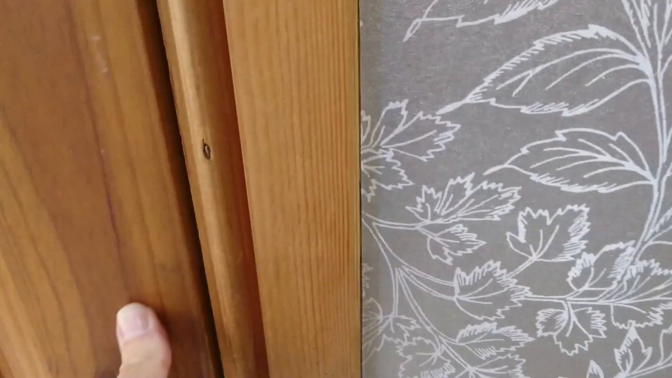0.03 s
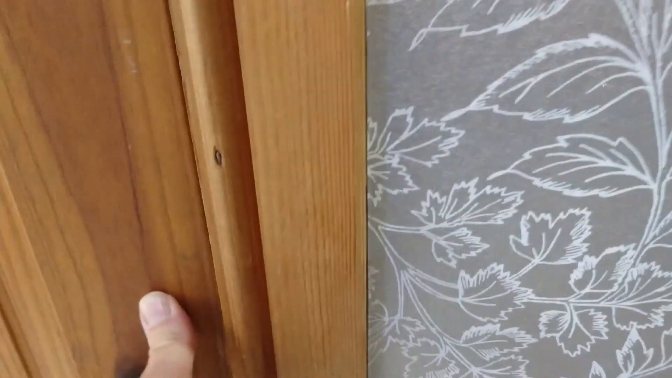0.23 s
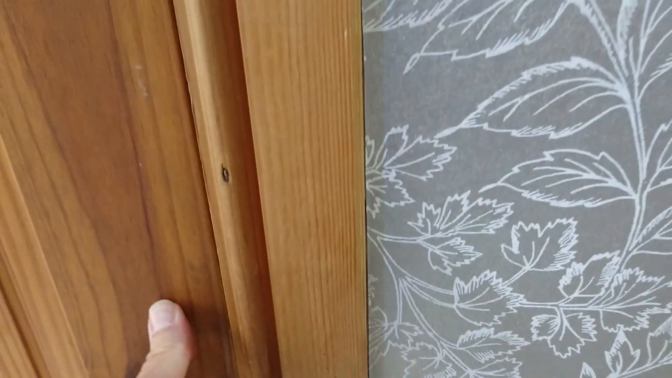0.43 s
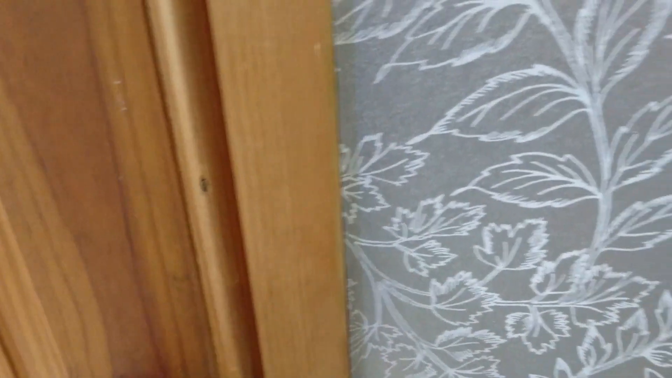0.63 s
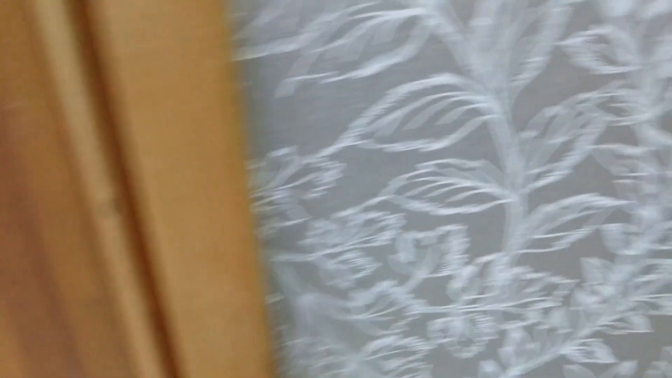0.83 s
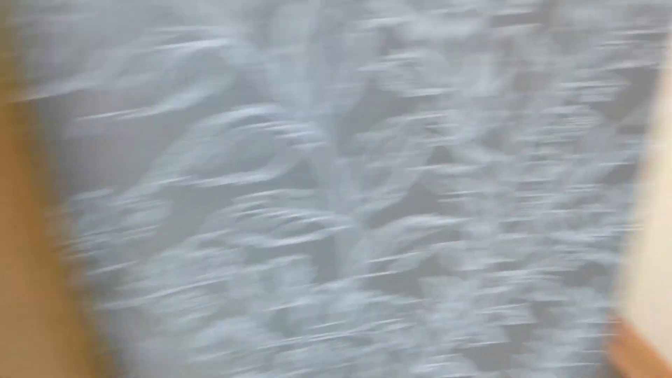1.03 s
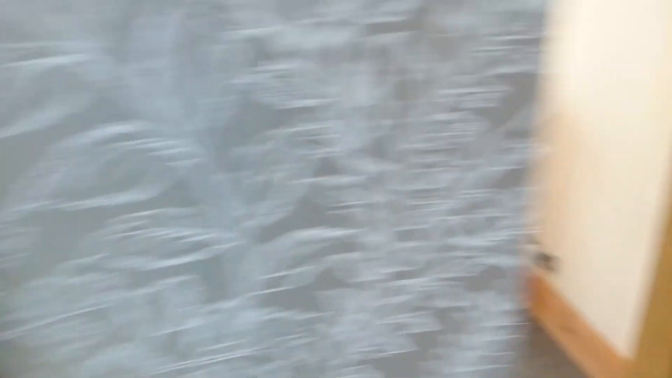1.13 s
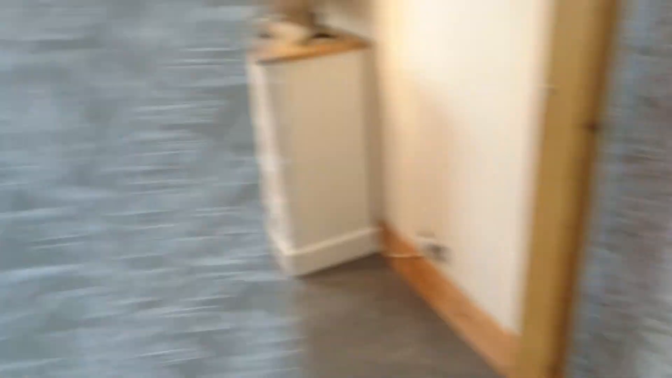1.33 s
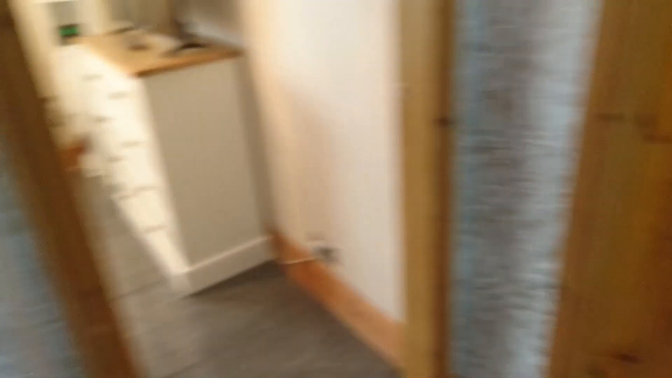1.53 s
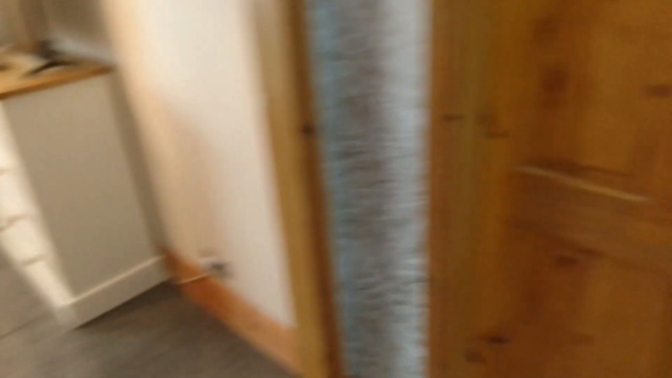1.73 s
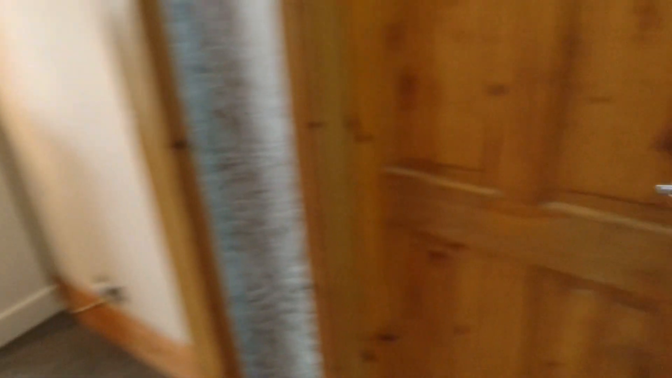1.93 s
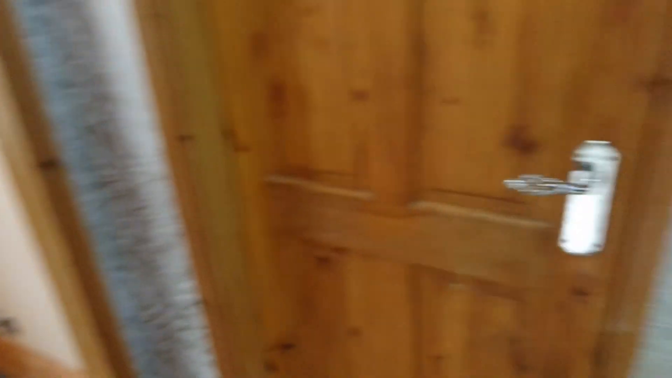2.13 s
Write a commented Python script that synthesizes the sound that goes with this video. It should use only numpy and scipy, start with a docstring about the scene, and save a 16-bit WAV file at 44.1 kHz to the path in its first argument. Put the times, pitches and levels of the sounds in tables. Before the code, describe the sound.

Close, hard thud of a pine door pushed shut, with a sharp metallic latch click indoors

```python
"""Cupboard door pushed shut

A pine door knocks and thuds into its frame close by while a metal catch ticks and snaps, and a small room rings.
Wood is noise cracks, low thumps and ringing panel tones; the catch is bright noise with short metal tones.
Faint squeaks (noise through two narrow resonances), dull handling bumps (short low tones) and soft
rustles (swelling noise) lie around it, over a low, hollow hum of steady filtered noise on the left."""
import sys
import numpy as np
from scipy import signal
from scipy.fft import rfft, irfft
from scipy.io import wavfile
from scipy.ndimage import uniform_filter1d

SR = 44100
rng = np.random.default_rng(int(sys.argv[2]) if len(sys.argv) > 2 else 0)


def put_to_file(sound):
    """Save the sound as 16-bit audio at rate SR, in the file named by the first command-line argument."""
    columns = np.atleast_2d(sound).T  # one column per channel
    safe = np.clip(columns, -1, 1)
    whole_steps = np.round(safe * 32767)
    wavfile.write(sys.argv[1], SR, whole_steps.astype(np.int16))


N = 97020  # samples: 2.2 seconds


def undb(db):
    """Turn decibels into a plain multiplier."""
    return 10 ** (np.asarray(db) / 20)


def unit(x):
    """Scale to an rms (average strength) of 1."""
    return x / np.sqrt(np.mean(x ** 2))


def times():
    """Time of each sample in seconds."""
    return np.arange(N) / SR


def freqs():
    """Frequencies of the spectrum in Hz."""
    return np.arange(N // 2 + 1) * SR / N


def curve(points, hz):
    """Read a table between its points, with frequency on a log axis."""
    points = np.array(points, float)
    return np.interp(np.log(np.maximum(hz, 1)), np.log(points[:, 0]), points[:, 1])


def fade(t60):
    """Exponential decay that falls by 60 dB in t60 seconds."""
    return np.exp(-np.log(1000) * times() / t60)


def swell(at, width):
    """Bell-shaped rise and fall around a moment; the width is its standard deviation in seconds."""
    return np.exp(-.5 * ((times() - at) / width) ** 2)


def add(out, start, x):
    """Mix a sound in at its start time."""
    i = max(int(start * SR), 0)
    out[:, i:] += x[..., :N - i]


def noise(colour, strength=1):
    """Noise of a given colour, rms 1; an uneven strength makes it grainy."""
    spectrum = rfft(strength * rng.standard_normal(N))
    return unit(irfft(spectrum * undb(curve(colour, freqs())), N))


def wide_noise(colour, strength=1):
    """Two-channel noise, alike in the bass and unrelated in the treble."""
    wide_hz = 626  # the two channels part company around here
    bass_cut = np.sqrt(1 + (wide_hz / np.maximum(freqs(), 1)) ** 4)
    side = irfft(rfft(noise(colour, strength)) / bass_cut, N)
    return unit(noise(colour, strength) + np.array([side, -side]))


def tint(x, gain):
    """Filter with the given gain at each frequency, which never sounds ahead of its input."""
    cepstrum = irfft(np.log(gain), N)
    # Folding the cepstrum forward in time gives the matching minimum phase.
    cepstrum[1:N // 2] *= 2
    cepstrum[N // 2 + 1:] = 0
    return irfft(rfft(x) * np.exp(rfft(cepstrum)), N)


def burst(colour, t60):
    """The short coloured crack of a contact: fading white noise through a filter."""
    # A flat colour. Each row: frequency in Hz, relative level in dB.
    white = [(20, 0), (20000, 0)]
    gain = unit(undb(curve(colour, freqs())))
    return tint(wide_noise(white) * fade(t60), gain)


def ring(modes, cycles=.2):
    """Decaying tones of alternating sign; each takes some cycles to build, so the deep ones come late."""
    t = times()
    total = 0
    for k, (hz, db, t60) in enumerate(modes):
        build = 1 - np.exp(-t * hz / cycles)
        total = total + (-1) ** k * undb(db) * np.sin(2 * np.pi * hz * t) * fade(t60) * build
    return total


def room(colour):
    """Echo of a contact: builds quickly, is grainy, and each octave dies at its own rate."""
    # How long the small room rings. Each row: frequency in Hz, time to fall by 60 dB in seconds.
    room_t60 = [(80, 0.57), (300, .6), (1000, .5), (3000, .44), (6000, 0.36), (12000, 0.34)]
    grain_db, grain_s, build_s = 2, .0015, 0.0052
    grain = unit(uniform_filter1d(rng.standard_normal(N), max(int(grain_s * SR), 1)))
    spectrum = rfft(wide_noise(colour, undb(grain_db * grain)))
    centres = 62.5 * 2. ** np.arange(9)  # octave bands in Hz
    out = 0
    for hz, share in zip(centres, np.eye(len(centres))):
        # This band is full at its own centre and gone at its neighbours' centres.
        weight = curve(list(zip(centres, share)), freqs())
        out = out + irfft(spectrum * weight, N) * fade(curve(room_t60, hz))
    return out * (1 - np.exp(-times() / build_s))


def hum():
    """A hollow rush with one broad resonance on the left, faint room air on the right: steady noise."""
    # Colour of the noise at each ear. Each row: frequency in Hz, relative level in dB per Hz.
    left_colour = [(25, -35), (65, -15), (110, -16), (180, -10), (290, -13.5), (400, -6), (510, 1.5),
                   (630, -6), (760, -19), (860, -22), (970, -38), (1400, -36), (2000, -40.5), (2600, -52.5),
                   (4000, -56.5), (5000, -54), (7000, -62), (9000, -66), (14000, -77)]
    right_colour = [(25, -17.5), (65, 1), (180, 1), (300, -5.5), (520, 2), (760, -20), (1000, 4),
                    (1300, -9), (2100, -4.5), (3200, -19), (4300, -12.5), (5600, -24.5), (7000, -19.5),
                    (8800, -25), (9900, -18), (11000, -35), (14000, -41)]
    left_db, right_db = -39, -67.5
    return np.array([undb(left_db) * noise(left_colour), undb(right_db) * noise(right_colour)])


def handling():
    """A hand bumps the microphone body, a short low tone mostly on the left; rustles are swells of noise."""
    # Hand bumps. Each row: centre in seconds, level on the left in dB, bell width in seconds.
    bump_rows = [(0.11, -34, 0.0051), (0.132, -25, 0.0065), (1.22, -46, 0.016), (2.019, -50, 0.024)]
    # Soft rustles. Each row: centre in seconds, level in dB, bell width in seconds.
    rustle_rows = [(0.017, -60, 0.15), (1.033, -73, .22), (1.327, -71.5, 0.094), (1.917, -68, 0.024)]
    # Colour of the rustling. Each row: frequency in Hz, relative level in dB per Hz.
    rustle_colour = [(500, -5.5), (1500, 9), (2400, 5), (3300, 0.5), (5000, 0), (7000, -2), (9000, -15),
                     (14000, -22.5)]
    bump_hz, bump_right_db = 68, -23.5  # right side relative to the left
    bumps, rustle = 0, 0
    for at, db, width in bump_rows:
        bumps = bumps + undb(db) * swell(at, width) * np.sin(2 * np.pi * bump_hz * (times() - at))
    for at, db, width in rustle_rows:
        rustle = rustle + undb(db) * swell(at, width)
    return bumps * undb([[0], [bump_right_db]]) + rustle * wide_noise(rustle_colour)


def squeak():
    """Brief friction of the settling door excites two narrow resonances: noise through two peaks."""
    # Faint squeaks. Each row: start in seconds, level in dB, attack in seconds,
    # time to fall by 60 dB in seconds.
    squeak_rows = [(0.604, -54, .05, 0.33), (1.47, -74, .04, 0.43), (1.63, -75, .06, .6)]
    # The two resonances. Each row: frequency in Hz, width in Hz, relative level in dB.
    resonances = [(3165, 300, -9.5), (4197, 270, -2.5)]
    left_db = -9  # left side relative to the right
    out = np.zeros((2, N))
    shape = sum(undb(db) / (1 + (2 * (freqs() - hz) / width) ** 2) for hz, width, db in resonances)
    for start, db, attack, t60 in squeak_rows:
        tone = unit(irfft(rfft(rng.standard_normal((2, N))) * shape, N))
        rise = np.minimum(times() / attack, 1)
        add(out, start, undb(db) * tone * rise * fade(t60))
    return out * undb([[left_db], [0]])


def catch():
    """The metal catch snaps and rattles; spring and strike plate ring briefly and the room answers."""
    # Contacts of the catch. Each row: start in seconds, level in dB,
    # extra spring level in dB, extra room level in dB.
    clicks = [(0.034, -24, 11, -3.5), (.2580, 2.5, -9, -1.5), (0.2602, 3, -13, -3),
              (.2730, -9.5, -8.5, -3.5), (.2850, -7.5, -8, -6)]
    # Tones of the spring, then of strike plate and spring together.
    # Each row: frequency in Hz, relative level in dB, time to fall by 60 dB in seconds.
    spring_modes = [(4550, -2, 0.0091), (4938, 3.5, .012), (5450, -6.5, .008)]
    plate_modes = [(2652, -24.5, .22), (4200, -16, 0.12), (4650, -23.5, 0.3), (5990, -8, 0.024),
                   (6450, -17, 0.036), (7213, -20.5, .15)]
    # Colour of the snap and its echo. Each row: frequency in Hz, relative level in dB per Hz.
    metal_colour = [(300, -30.5), (1000, -15), (2100, -8.5), (2650, -2), (3400, -7), (4600, -1.5),
                    (6000, -1), (6950, -2.5), (7350, -11.5), (10000, -17), (11500, -32), (14000, -30),
                    (16000, -46)]
    spring_db, plate_db, snap_db, room_base_db = -18.5, -15.5, -15, -26
    snap_t60 = 0.016  # seconds
    out = np.zeros((2, N))
    spring = ring(spring_modes)
    plate = undb(plate_db) * ring(plate_modes, cycles=3)
    for start, db, ring_db, room_db in clicks:
        snap = undb(snap_db) * burst(metal_colour, snap_t60)
        sprung = undb(spring_db + ring_db) * spring
        echo = undb(room_base_db + room_db) * room(metal_colour)
        add(out, start, undb(db) * (snap + plate + sprung + echo))
    return out


def door():
    """Wood meets wood: each blow cracks, thumps at its point of contact, rings the panel and fills the room."""
    # Blows. Each row: start in seconds, level in dB, dull above this many Hz,
    # extra room level in dB, thump frequency in Hz, extra thump level in dB.
    blows = [(.0350, -13, 1944, -0.5, 138, 0.5), (0.229, -8.5, 2700, -19.5, 92, 1),
             (.2520, -1.5, 1807, -5, 300, 1.5), (0.2557, 4, 4120, -2, 580, -6),
             (0.2721, -4, 800, -4, 100, 0.5), (.2835, -5, 460, -2, 92.7, 5.5)]
    # Tones of door panel and carcass.
    # Each row: frequency in Hz, relative level in dB, time to fall by 60 dB in seconds.
    panel_modes = [(65, -12, .35), (93, -5, .3), (157.8, -1, 0.99), (182.8, -7, 0.62), (244, -16, 0.67),
                   (283.7, -8, 0.43), (319, -3.5, 0.44), (381, -18, 0.17), (459.7, -2, .4),
                   (602, -5.5, .24), (655.6, -5.5, .3), (709.4, -12.5, 0.81), (1039, -16.5, 0.4),
                   (1272, -11, 0.32)]
    # Colour of the blow and of its echo. Each row: frequency in Hz, relative level in dB per Hz.
    crack_colour = [(40, -23.5), (90, -1.5), (300, 2), (580, 0), (760, -6), (900, -19), (1300, -4.5),
                    (2600, -14.5), (5000, -21), (14000, -50.5)]
    echo_colour = [(30, -31), (60, -3.5), (120, 1.5), (220, -5.5), (330, -2.5), (600, -3), (900, -16.5),
                   (1300, -8), (2000, -13.5), (2700, -14), (5000, -24.5), (14000, -46)]
    panel_db, crack_db, thump_base_db, room_base_db = -26.5, -20, -16, -23
    crack_t60, thump_t60 = 0.071, 0.12  # seconds
    out = np.zeros((2, N))
    panel = undb(panel_db) * ring(panel_modes, cycles=1)
    for start, db, dull_hz, room_db, thump_hz, thump_db in blows:
        crack = undb(crack_db) * burst(crack_colour, crack_t60)
        thump = ring([(thump_hz, thump_base_db + thump_db, thump_t60)], cycles=0.19)
        echo = undb(room_base_db + room_db) * room(echo_colour)
        # A gentle low-pass sets how dull this contact is.
        b, a = signal.butter(2, min(dull_hz, SR / 3), fs=SR)
        add(out, start, undb(db) * signal.lfilter(b, a, panel + crack + thump + echo))
    return out


def ports(x):
    """Two microphone ports colour the sound differently: the left is boxy in the low mids."""
    # Left level minus right level. Each row: frequency in Hz, difference in dB.
    left_minus_right = [(200, 0.5), (330, 0.5), (450, 6.5), (700, 17.5), (950, 2.5), (1300, -8), (2200, -6),
                        (2900, 7.5), (3900, -5), (6000, 4), (7200, -2.5), (8500, -7.5), (15000, -1.5)]
    ratio = undb(curve(left_minus_right, freqs()))
    # The two gains always add up to 2.
    left_gain, right_gain = 2 * ratio / (1 + ratio), 2 / (1 + ratio)
    return np.array([tint(x[0], left_gain), tint(x[1], right_gain)])


def scene():
    """Door and catch pass through the ports; the other layers are simply added."""
    return ports(door() + catch()) + squeak() + handling() + hum()


def record(dry):
    """The recorder cuts the deepest bass and the top."""
    bass_cut = signal.butter(3, 45, "high", fs=SR, output="sos")
    top_cut = signal.ellip(8, .2, 70, 15000, fs=SR, output="sos")
    return signal.sosfilt(top_cut, signal.sosfilt(bass_cut, dry))


dry = scene()
out = record(dry)
put_to_file(out)
```